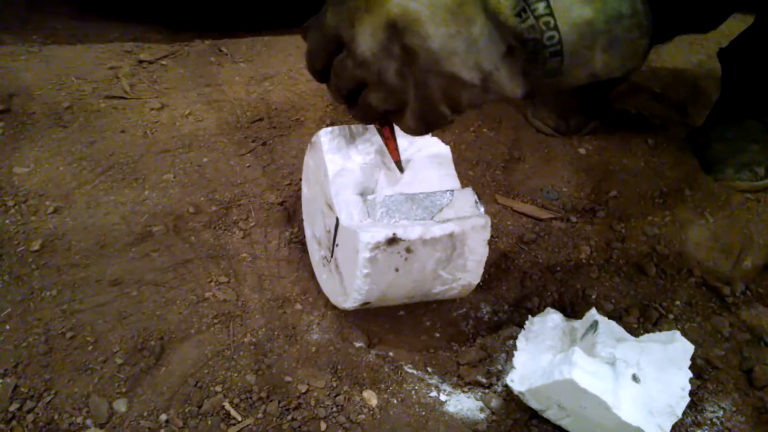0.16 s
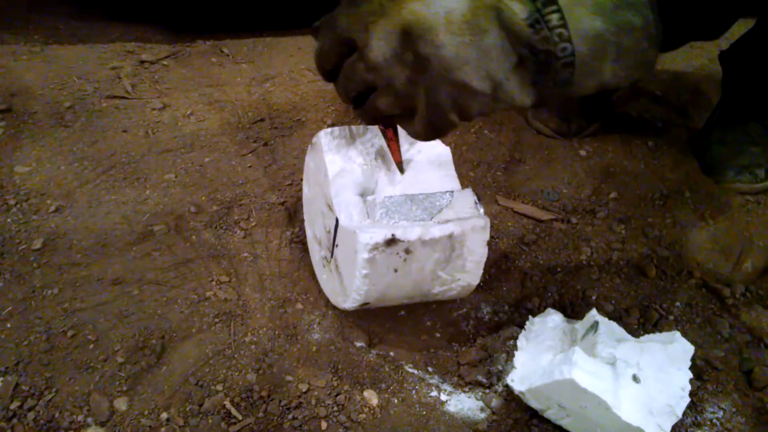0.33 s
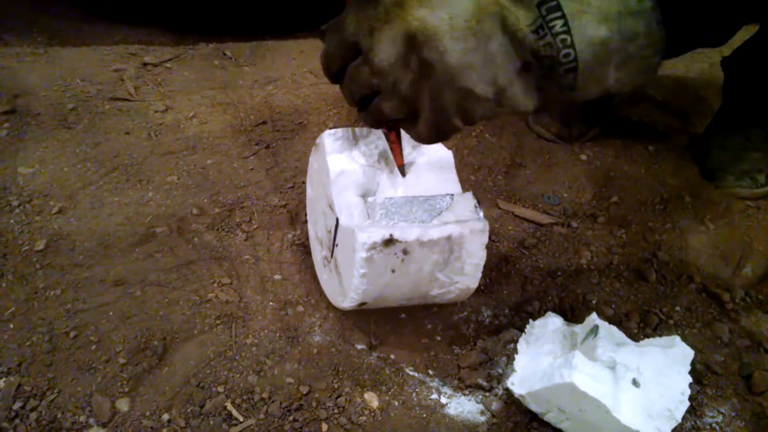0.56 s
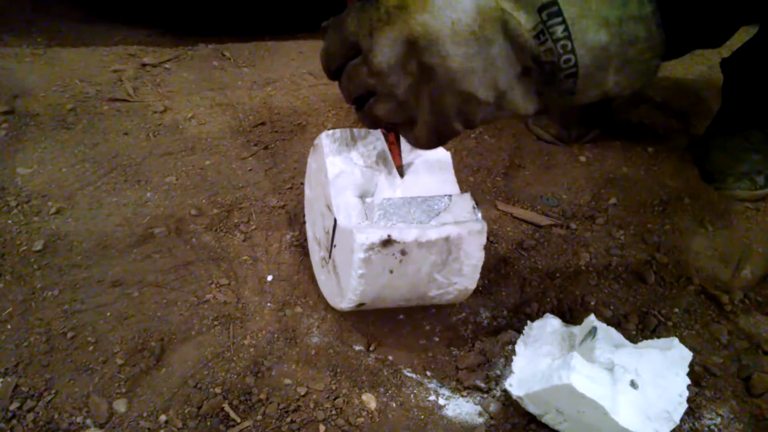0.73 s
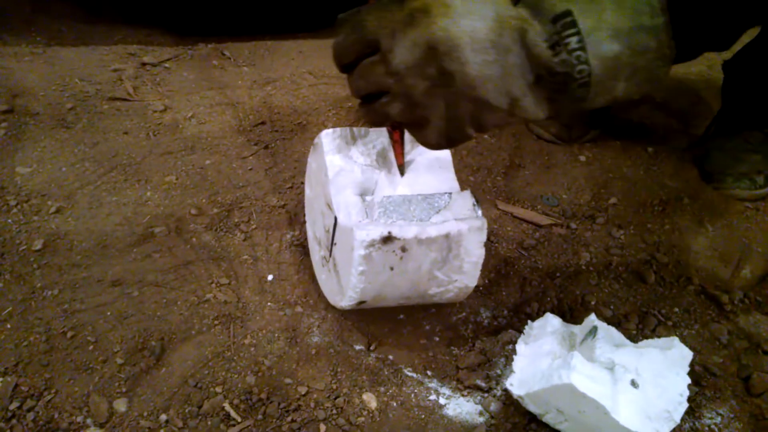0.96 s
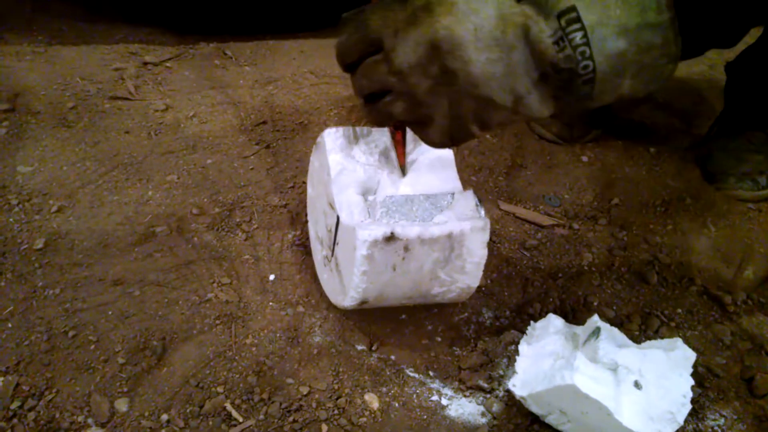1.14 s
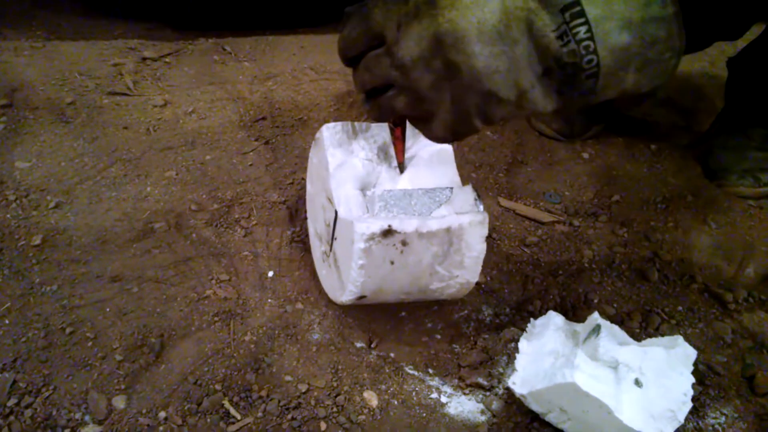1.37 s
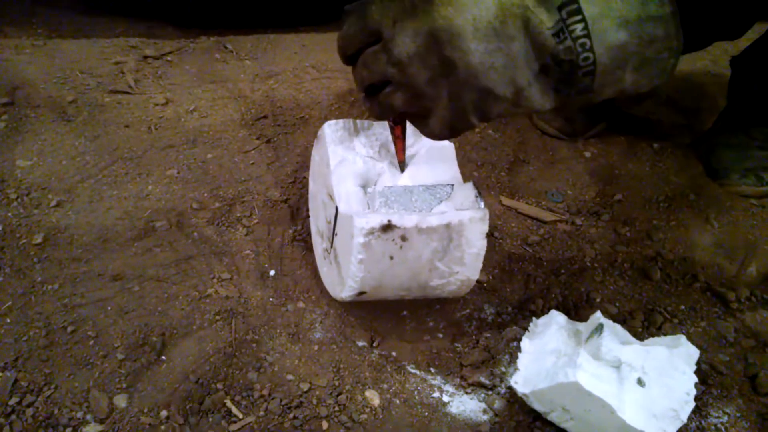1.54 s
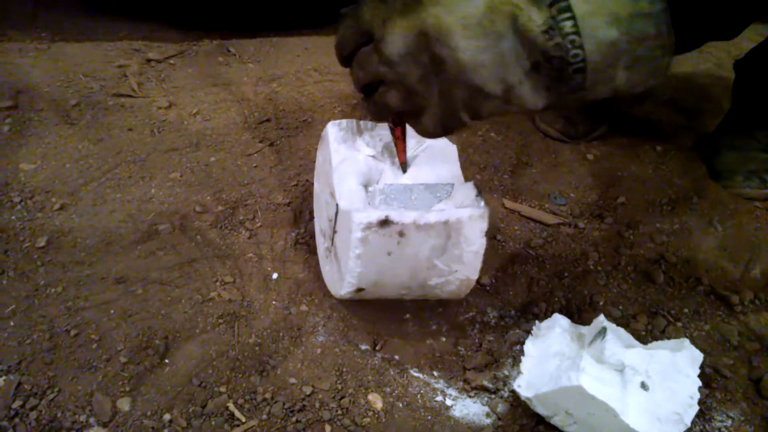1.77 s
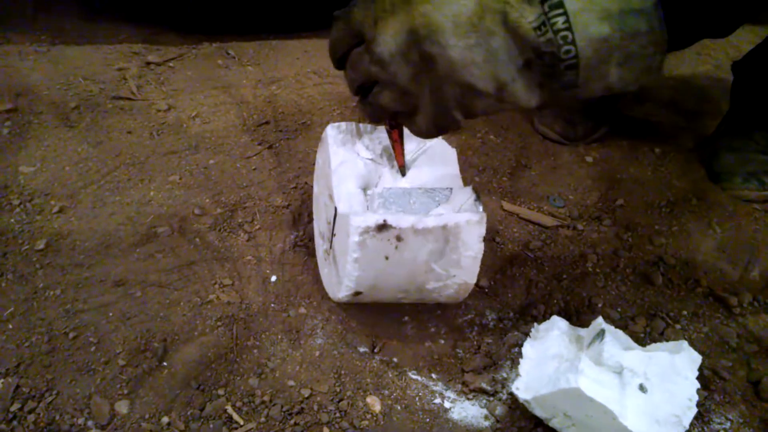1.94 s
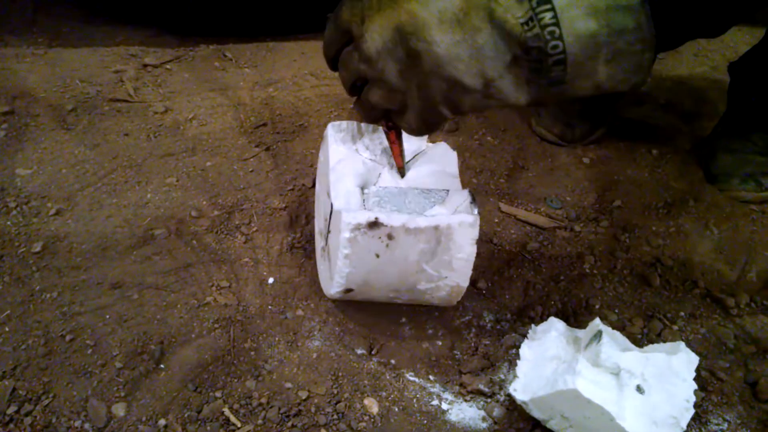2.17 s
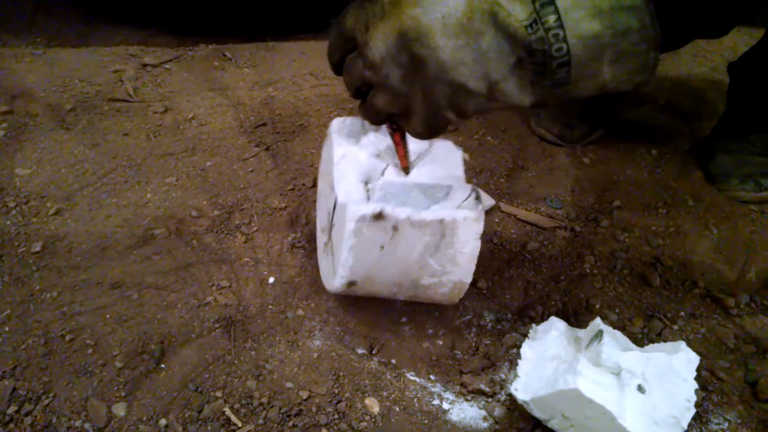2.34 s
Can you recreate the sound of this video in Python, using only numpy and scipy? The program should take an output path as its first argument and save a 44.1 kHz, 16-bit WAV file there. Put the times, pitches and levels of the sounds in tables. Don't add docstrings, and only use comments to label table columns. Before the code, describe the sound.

Seven sharp hammer blows on a steel chisel crunch into plaster, clanking and ringing in a shed

```python
import sys
import numpy as np
from scipy import signal
from scipy.fft import rfft, irfft, next_fast_len
from scipy.io import wavfile
from scipy.ndimage import map_coordinates

SR = 44100
rng = np.random.default_rng(int(sys.argv[2]) if len(sys.argv) > 2 else 0)


def boost_factor(decibels):
    exponent = np.asarray(decibels, float) / 20
    return 10 ** exponent


def to_wav(sig):
    pcm = np.clip(np.atleast_2d(sig), -1, 1) * 32767
    pcm = np.round(pcm).astype(np.int16)
    wavfile.write(sys.argv[1], SR, pcm.T)


N = 105840
FAR_TOP_HZ = 15550


def unit(x):
    return x / np.sqrt(np.mean(x ** 2) + 1e-20)


def along(points, hz):
    f, v = np.transpose(points)
    return np.interp(np.log(hz + 1), np.log(f + 1), v)


def filtered(x, response):
    n = x.shape[-1]
    m = next_fast_len(n + 4096)
    return irfft(rfft(x, m) * response(np.fft.rfftfreq(m, 1 / SR)), m)[..., :n]


def causal(x, db_of):
    cepstrum = irfft(np.log(boost_factor(db_of(np.fft.rfftfreq(2048, 1 / SR))) + 1e-5))
    cepstrum[1:1024] *= 2
    cepstrum[1025:] = 0
    h = irfft(np.exp(rfft(cepstrum)))
    return signal.fftconvolve(x, h / np.linalg.norm(h))[:len(x)]


def ring(t, hz, db, t60, rise_s=0.00016):
    return boost_factor(db - 60 * t / t60) * np.sin(2 * np.pi * hz * t) * (1 - np.exp(-t / rise_s))


# frequency in Hz, likeness from 0 to 1.
ALIKE = [(100, 0.1), (500, .65), (1250, 0.91), (1900, 1), (2550, .99), (3800, 1), (5000, 0.77), (9000, .4)]


def spread(pair, db_of):
    turn = lambda hz: np.arccos(np.clip(along(ALIKE, hz), -1, 1)) / 2
    mid, side = filtered(pair, lambda hz: boost_factor(db_of(hz)) * [np.cos(turn(hz)), np.sin(turn(hz))])
    return np.array([mid + side, mid - side])


# frequency in Hz, level in dB.
AIR = [(15, -33), (40, -9.5), (70, -7), (200, -15), (400, -17.5), (3000, -20.5), (6000, -25.5),
       (15500, -25)]


def air():
    level_db = -64
    noise = rng.standard_normal((2, N))
    return boost_factor(level_db) * unit(spread(noise, lambda hz: along(AIR, hz) - 60 * (hz > FAR_TOP_HZ)))


# start in seconds, level in dB, pitch in Hz, t60 in seconds.
CHIPS = [
    (1.37, -60, 123, 0.15),
    (1.931, -58, 137, 0.16),
    (2.249, -51, 128, 0.11),
    (2.29, -26, 520, 0.031),
]


def chips():
    out = 0
    for s, db, hz, t60 in CHIPS:
        t = np.maximum(np.arange(N) / SR - s, 0)
        out = out + ring(t, hz, db, t60, rise_s=0.004)
        out = out + ring(t, hz * .62, db - 4, t60, rise_s=0.0071)
    return out


# centre in Hz, width in Hz, level in dB.
PORT = [(3430, 600, 5), (5010, 160, 10.5), (8860, 310, -16), (12600, 830, -10), (14130, 670, 16)]


def port_db(hz):
    return sum(db * np.exp(-.5 * ((hz - c) / w) ** 2) for c, w, db in PORT)


# frequency in Hz, t60 in seconds.
SHED = [(200, 1.8), (1000, 0.89), (4000, 0.89), (8000, 0.53), (14000, .35)]


def shed(t, db_of):
    rise_s = 0.0067
    hz, u, z = signal.stft(rng.standard_normal((2, len(t))), SR, nperseg=256)
    decay = boost_factor(-60 * u / along(SHED, hz)[:, None])
    tail = signal.istft(z * decay, SR, nperseg=256)[1][:, :len(t)]
    tail = spread(tail * (1 - np.exp(-(t / rise_s) ** 2)), db_of)
    return tail / np.sqrt(np.mean(tail[:, :SR // 10] ** 2))


# frequency in Hz, level in dB.
TAIL = [(120, -46.5), (250, -20.5), (550, -10.5), (2200, -7), (3400, -6.5), (5600, -16), (7300, -4),
        (8000, -11.5)]
# frequency in Hz, level in dB.
TAIL_TOP = [(8100, -26), (8800, -25), (10300, -15.5), (11400, -17), (12600, -36.5), (13600, -43.5),
            (14700, -36), (15500, -34)]


def wash(t, ridge_hz, ridge_db):
    ridge_width_hz = 230

    def wash_db(hz):
        tail_db = np.where(hz < 8000, along(TAIL, hz), along(TAIL_TOP, hz))
        ridge = ridge_db * np.exp(-.5 * ((hz - ridge_hz) / ridge_width_hz) ** 2)
        return tail_db + port_db(hz) - 60 * (hz > FAR_TOP_HZ) + ridge
    return shed(t, wash_db)


def wall_echo(t, near, db):
    delay_s, smear_s, n = 0.028, 0.026, 1500
    smear = rng.standard_normal(n) + .2 * rng.standard_normal((2, n))
    smear = smear * t[:n] * boost_factor(-60 * t[:n] / smear_s)
    late = np.roll(near, round(delay_s * SR))[None]
    return signal.fftconvolve(late, smear / np.linalg.norm(smear[0]), axes=1)[:, :SR] * boost_factor(db)


def thump(t, db):
    peak_s = 0.00062
    return [[-.42], [.58]] * (boost_factor(db) * t / peak_s * np.exp(1 - t / peak_s))


def shimmer(t):
    sd_db, per_s = 3, 80
    return boost_factor(sd_db * map_coordinates(rng.standard_normal(size=100), [t * per_s]))


# pitch in Hz, column of RINGS.
STEEL_HZ = [(3758, 0), (3815, 0), (6681, 0), (6640, 0), (6304, 1), (7104, 2), (11262, 3)]
# level in dB, t60 in seconds.
STEEL = [(-13.5, 0.43), (-8.5, 0.96), (7, 0.33), (-9.5, 0.69), (4.5, 0.45), (4, 0.41), (2.5, .25)]
# level in dB of the chisel modes, of the 6.3, 7.1 and 11.3 kHz hammer modes.
RINGS = [(-28, -62.5, -62.5, -39), (-55, -46.5, -41.5, -40), (-42.5, -60, -52, -48), (-78, -46.5, -70, -52),
         (-57, -35, -36, -50.5), (-56, -43, -28.5, -38.5), (-69, -41.5, -27.5, -45)]


def steel_rings(t, blow):
    levels = RINGS[blow]
    modes = zip(STEEL_HZ, STEEL)
    return sum(ring(t, hz, levels[c] + db, t60) * shimmer(t) for (hz, c), (db, t60) in modes)


CLANK_HZ = [5050, 7425, 11261]
CLANK_T60 = [0.026, 0.062, 0.029, 0.037]
# main pitch in Hz, level in dB of main, of 5, 7.4 and 11.3 kHz modes.
CLANK = [(3752, 1.5, -18.5, -17, -28), (3547, 2.5, -19.5, -11.5, -26), (3932, 7.5, -41, -14, -13),
         (4022, 5, -11.5, -4, -11.5), (4000, -1.5, -12.5, 2.5, -22.5), (3425, -6.5, -3.5, -11, -6.5),
         (3925, -4, -14, -2.5, -28.5)]


def clank(t, blow, partner_ratio, partner_db):
    hz, *levels = CLANK[blow]
    modes = zip([hz, *CLANK_HZ], levels, CLANK_T60)
    out = sum(ring(t, f, db, t60, rise_s=0.00076) for f, db, t60 in modes)
    return out + ring(t, hz * partner_ratio, levels[0] + partner_db, CLANK_T60[0], rise_s=0.00024)


# mode in Hz, dB, second mode in Hz, dB, crunch top end in dB.
KNOCK = [(520, -17.5, 1100, -20, -4.5), (556, -19.5, 1200, -31.5, -8), (502, -13, 4800, -21, -20),
         (1514, -16.5, 2050, -20, -6.5), (553, -16.5, 1330, -17, 1), (864, -41, 1300, -28.5, -6),
         (620, -16, 1140, -15, 0.5)]


def knock(t, blow):
    t60 = 0.027
    return ring(t, *KNOCK[blow][:2], t60) + ring(t, *KNOCK[blow][2:4], t60)


# frequency in Hz, level in dB.
CRUNCH = [(150, -16.5), (450, -12.5), (2400, -4.5), (3700, -4.5), (5700, -10.5), (8500, -12),
          (12500, -17.5), (15000, -33)]


def crunch(t, blow, long_db):
    top_end_hz, grain_sd_db, length_s = 10900, 3.9, 0.14 * boost_factor(long_db)
    grain_db = grain_sd_db * rng.standard_normal(SR // 40 + 1).repeat(40)[:SR]
    grit = rng.standard_normal(SR) * boost_factor(grain_db)
    decay = boost_factor(-60 * (t / length_s) ** 1.202)
    return causal(grit * decay, lambda hz: along(CRUNCH, hz) + port_db(hz) + KNOCK[blow][4] * (hz > top_end_hz))


# frequency in Hz, difference in dB.
LEFT = [(300, -2.5), (1300, -0.5), (2550, -0.5), (3600, -3.5), (9000, -6), (15000, -14.5)]


def aimed(x):
    return filtered(x, lambda hz: boost_factor(np.array([[.5], [-.5]]) * along(LEFT, hz)))


# start in seconds, peak in dB, shed in dB, thump in dB, crunch length in dB.
BLOWS = [
    (.232, 1.5, -27, -6.5, -17),
    (0.5616, -1, -27.5, -2, -15),
    (.9454, -14, -26.5, -35, -12.5),
    (1.222, -4, -21.5, -17, -9.5),
    (1.5078, 2, -27, 2.5, -14),
    (1.8128, 2.5, -25.5, 0, -11),
    (2.1079, 3, -25.5, 1.5, -12),
]
# clank partner as pitch ratio, its dB, shed ridge in Hz, its dB, wall echo in dB.
SHADES = [(1.05, -6.5, 3780, 14, -2.5), (1.042, -1, 3650, -1.5, -2.5), (1.04, -8.5, 4100, 10, -2.5),
          (1.2, -10, 3300, 3.5, -1), (0.945, -1, 1900, -4.5, -4), (1.17, -1.5, 3100, 2.5, -2.5),
          (1, -1.5, 3150, 1.5, -2)]


def chisel():
    out, t = np.zeros((2, N + 2 * SR)), np.arange(SR) / SR
    for blow, (s, db, shed_db, thump_db, long_db) in enumerate(BLOWS):
        ratio, partner_db, ridge_hz, ridge_db, wall_db = SHADES[blow]
        plaster = .5 * crunch(t, blow, long_db)
        modes = clank(t, blow, ratio, partner_db) + knock(t, blow)
        steel = steel_rings(t, blow)
        echo = wall_echo(t, plaster + modes, wall_db - 20.5)
        wet = signal.fftconvolve((modes + steel)[None], shed(t, port_db), axes=1)[:, :SR]
        far = echo + boost_factor(shed_db - 39.5) * wet + boost_factor(shed_db - 8.5) * wash(t, ridge_hz, ridge_db)
        both = aimed(plaster + modes + steel + far) + thump(t, thump_db)
        out[:, round(s * SR):][:, :SR] += boost_factor(db) * both
    return out[:, :N]


def scene():
    return air() + chips() + chisel()


def low_pass(x):
    return signal.sosfilt(signal.butter(12, 16480, fs=SR, output="sos"), x)


# frequency in Hz, left lead in radians.
LEADS = [(0, 0), (1400, 0), (2550, -3.14), (3850, -6.28), (5150, -9.42), (6500, -12.57), (8000, -15.7),
         (16000, -33)]


def record(dry):
    knee_db, duck_ratio, recover_db_per_s, duck_s = -30.5, 0.2, 63, 0.024
    full, low_cut_hz, top_hz, top_edge_hz = .97, 13, 16500, 600
    lead = lambda hz: np.array([[.5], [-.5]]) * np.interp(hz, *np.transpose(LEADS))
    x = filtered(dry, lambda hz: np.exp(1j * lead(hz)))
    ramp = recover_db_per_s * np.arange(N) / SR
    held_db = np.maximum.accumulate(20 * np.log10(np.abs(x).max(0) + 1e-9) + ramp) - ramp
    k = 1 / (duck_s * SR)
    gain_db = signal.lfilter([k], [1, k - 1], -duck_ratio * np.maximum(held_db - knee_db, 0))
    clipped = np.clip(x * boost_factor(gain_db), -full, full)
    low_cut = lambda hz: (1j * hz / (low_cut_hz + 1j * hz)) ** 2
    mix = filtered(clipped, lambda hz: np.clip((top_hz - hz) / top_edge_hz, 0, 1) * low_cut(hz))
    return low_pass(mix)


dry = scene()
out = record(dry)
to_wav(out)
```